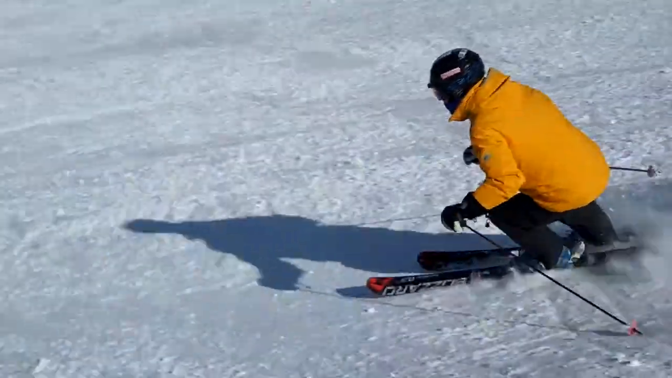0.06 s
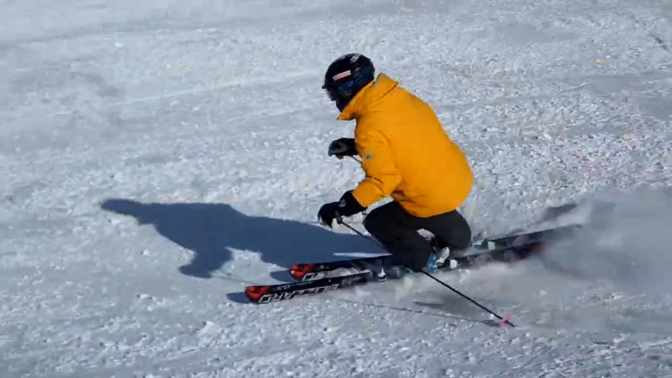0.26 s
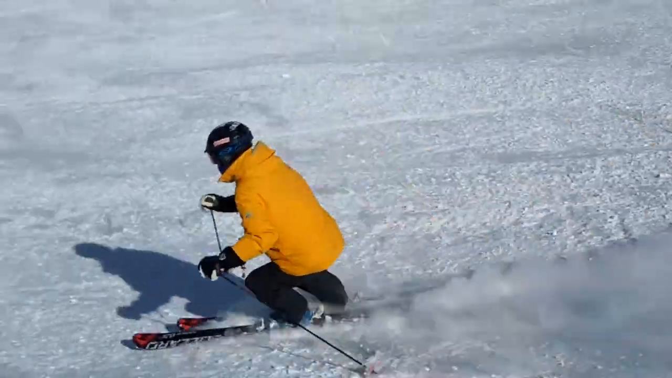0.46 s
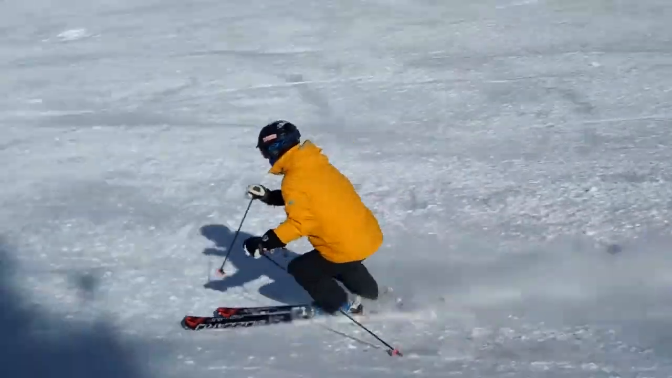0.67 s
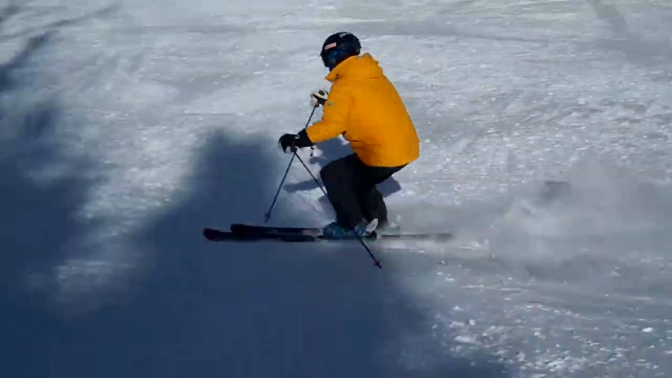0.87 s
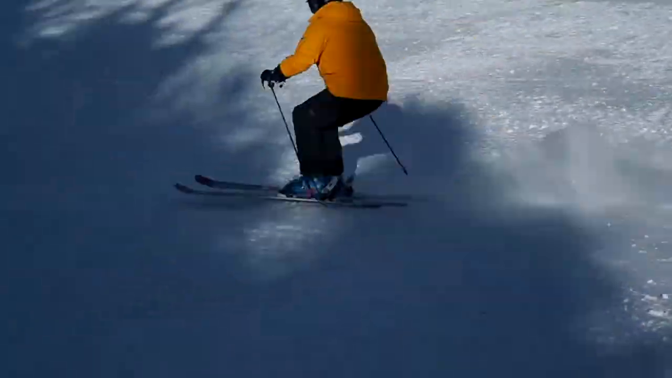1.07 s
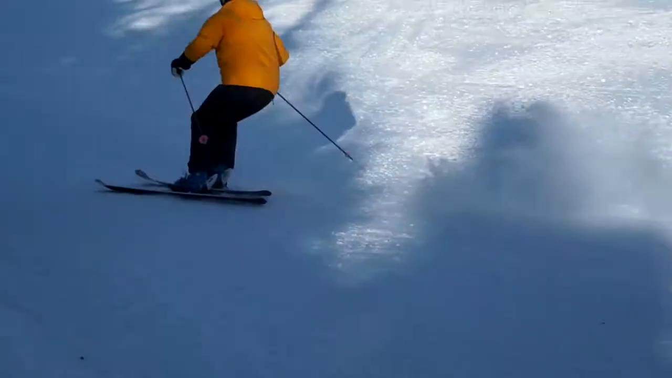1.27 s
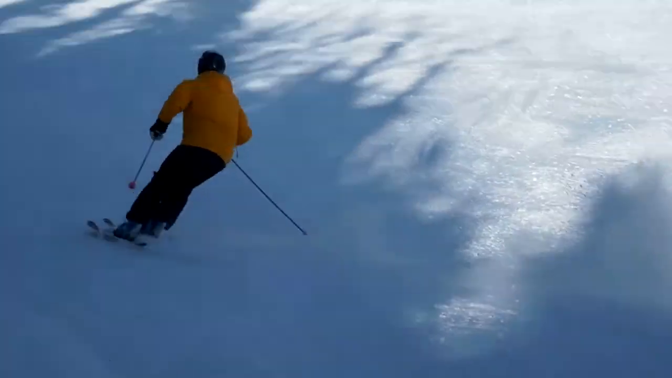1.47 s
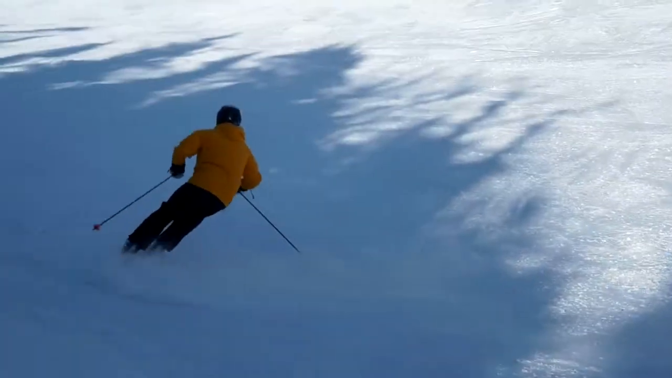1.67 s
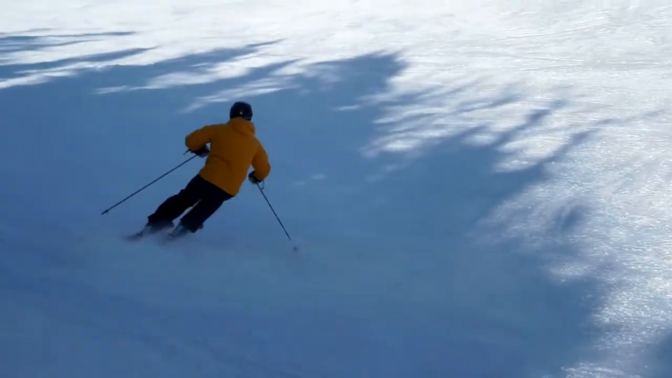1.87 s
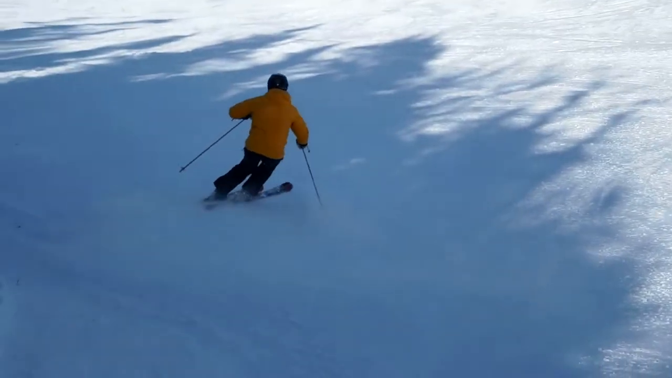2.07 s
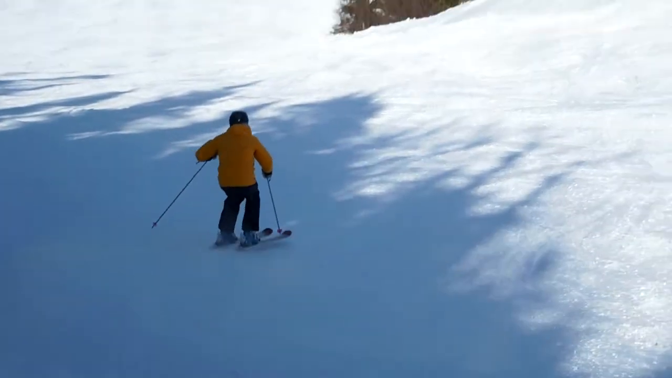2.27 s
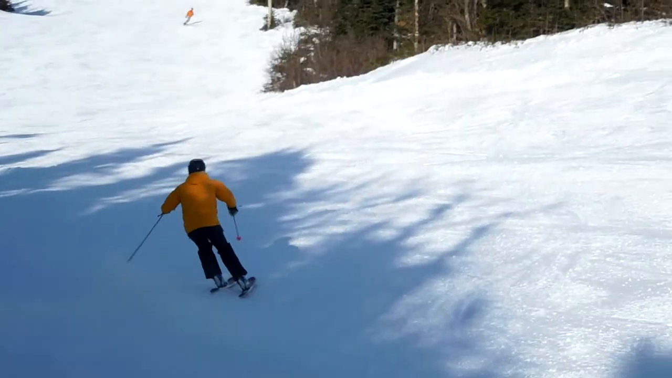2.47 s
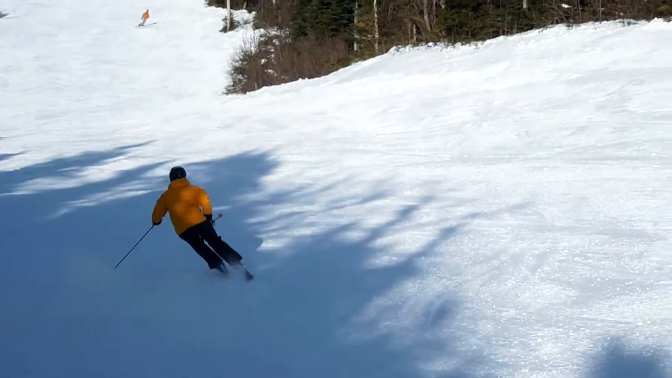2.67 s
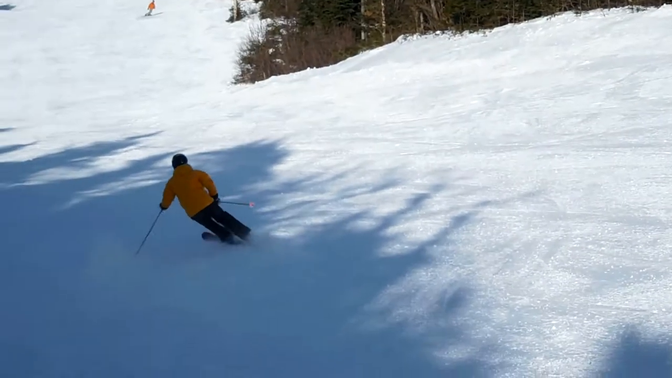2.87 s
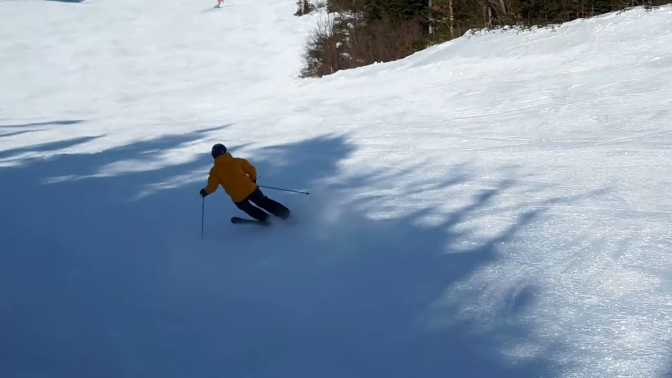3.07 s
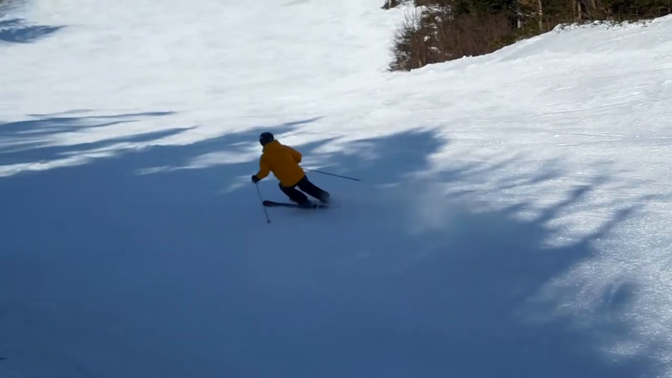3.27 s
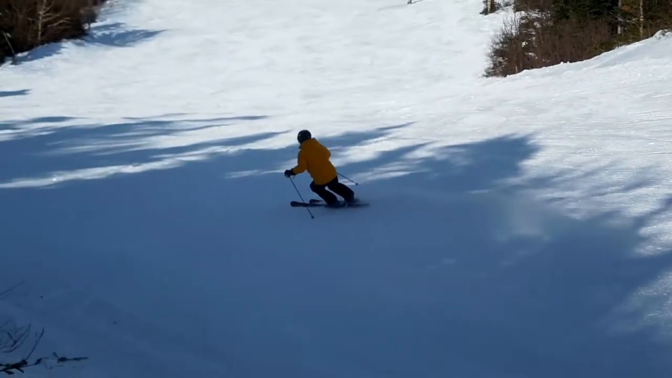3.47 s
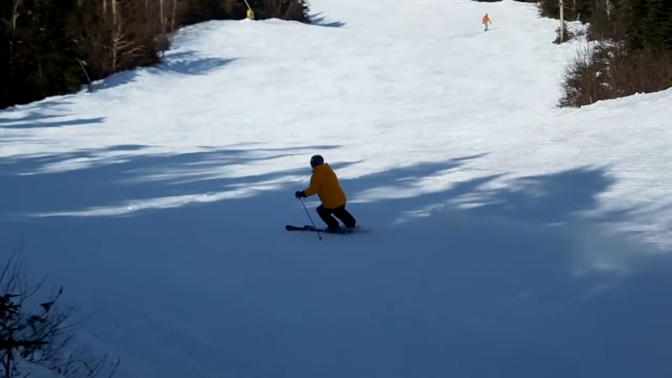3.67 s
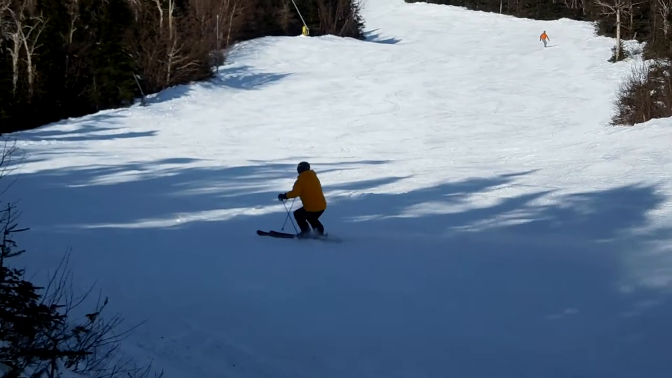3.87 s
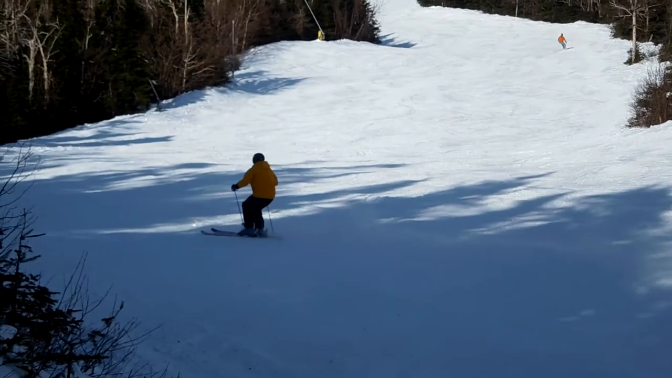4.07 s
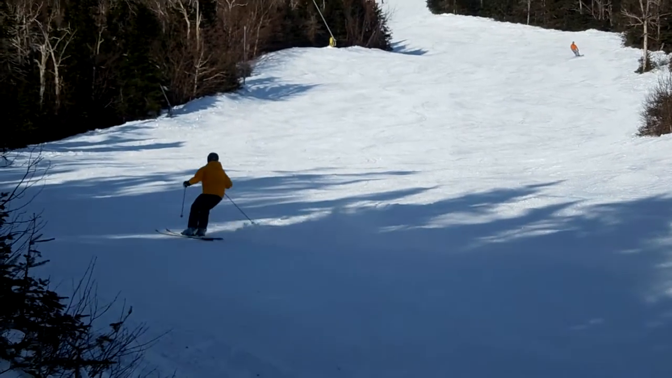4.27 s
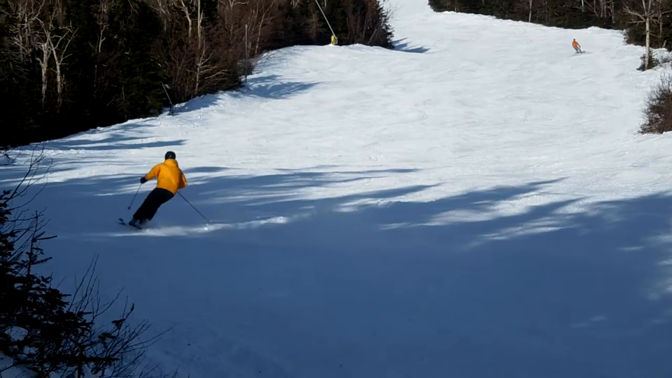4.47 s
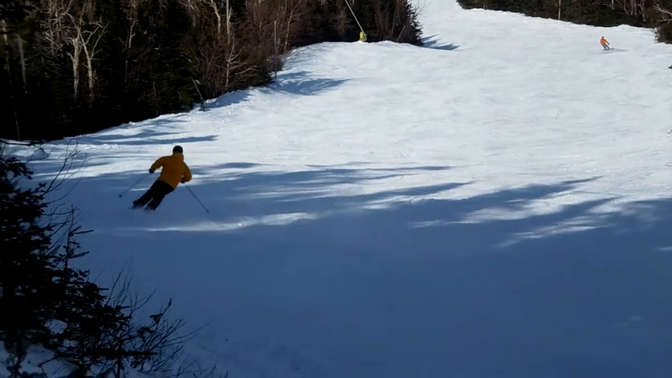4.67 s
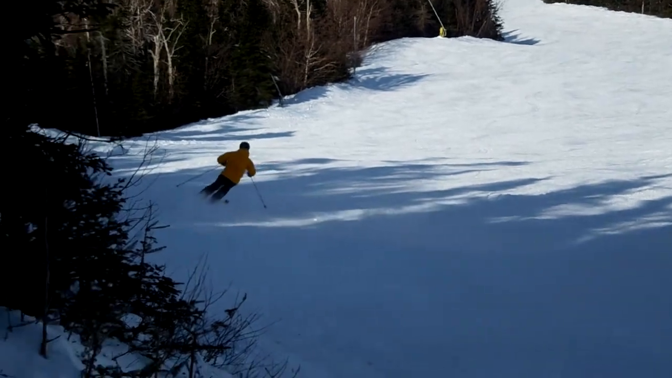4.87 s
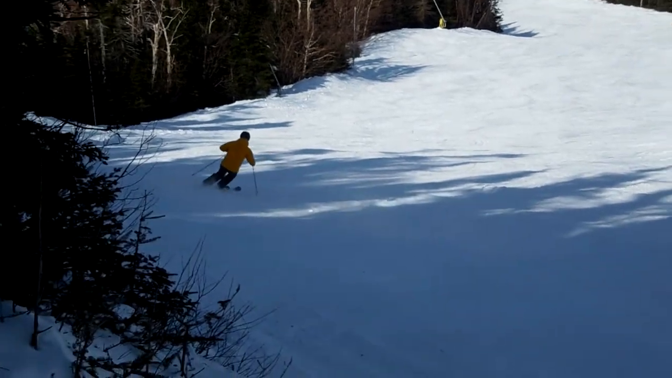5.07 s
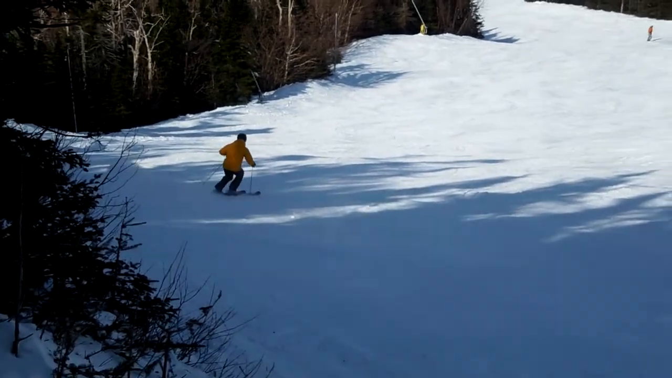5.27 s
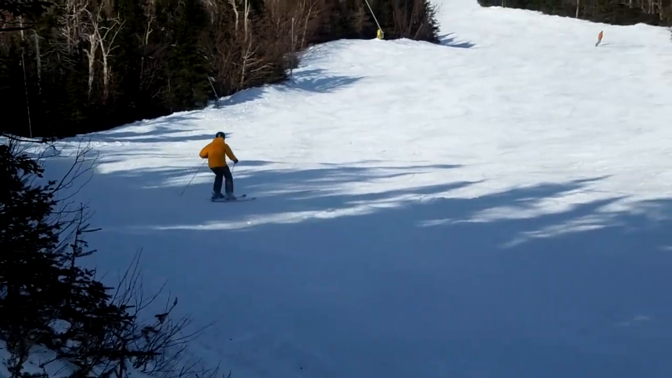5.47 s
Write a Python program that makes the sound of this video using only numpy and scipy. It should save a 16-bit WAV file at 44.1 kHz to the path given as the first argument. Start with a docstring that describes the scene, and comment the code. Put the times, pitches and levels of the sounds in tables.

```python
"""A skier carves past close by and runs away down a groomed slope in four linked turns.
Steel edges spray hissing snow, scrape and rumble: three streams of random grains, each with its own colour.
Bites ring as filtered edge slips, knocks as two damped modes, ice ticks as short bursts of pitched noise.
Behind lie the even hiss of the slope, a faint far hum and a light gusty wind on two microphone ports,
all made from shaped noise."""
import sys
import numpy as np
from scipy import signal
from scipy.fft import rfft, irfft
from scipy.io import wavfile
from scipy.ndimage import uniform_filter1d

SR = 44100
rng = np.random.default_rng(int(sys.argv[2]) if len(sys.argv) > 2 else 0)


def int16_out(signal):
    """Quantize to a 16-bit WAV file."""
    q = np.round(np.clip(np.atleast_2d(signal).T, -1, 1) * 32767)
    wavfile.write(sys.argv[1], SR, q.astype(np.int16))


N = 243167

# Colours of the sprayed snow, close by and down the slope.
# Each row: frequency in Hz, relative density in dB per Hz.
SPRAY_NEAR_COLOUR = [(1760, -21), (3000, -16), (3240, -28), (3540, -13), (5600, -8.5), (6510, -4),
                     (7220, 3.5), (8510, -2), (9560, -1.5), (10700, -7.5), (11700, -11), (15500, -22.5)]
SPRAY_FAR_COLOUR = [(2240, -45), (3800, -16), (4080, -13), (5530, -4.5), (7780, 2), (10100, -6),
                    (11100, -10.5), (15500, -38)]
# Colour of the scraping edges. Each row: frequency in Hz, relative density in dB per Hz.
SCRAPE_COLOUR = [(600, -8), (950, -13), (1300, -6.5), (1800, 0.5), (2700, 0), (3500, 1), (4200, -3),
                 (5000, -1), (6500, -30)]
# Colours of the running surface's rumble, close by and down the slope.
# Each row: frequency in Hz, relative density in dB per Hz.
RUMBLE_NEAR_COLOUR = [(70, -15), (150, -0.5), (200, 2), (300, -1.5), (450, -1), (750, -5), (1100, -11.5),
                      (1600, -14), (2400, -32)]
RUMBLE_FAR_COLOUR = [(90, -2), (160, -5), (280, 1), (400, -12.5), (540, -3.5), (720, -3.5), (1000, -9),
                     (1500, -7), (2400, -32)]


def skis():
    """Spray, scrape and rumble of broken snow, all shaken in level by one shared chatter."""
    spray_gain, scrape_gain, rumble_gain = friction()
    chatter = waver(10, 70)
    # powder thrown off the edges: dense fine grains
    spray = receding(grains(per_s=14000, spread_db=2.0), SPRAY_NEAR_COLOUR, SPRAY_FAR_COLOUR, patchy_db=2.1)
    spray = spray * spray_gain * gain_of(0.75 * chatter)
    # steel shaving the packed snow: sparser, more uneven grains
    scrape = receding(grains(per_s=7000, spread_db=2.5), SCRAPE_COLOUR, SCRAPE_COLOUR, patchy_db=1.57)
    scrape = scrape * scrape_gain * gain_of(1.15 * chatter)
    # lumps drumming on the running surface: the sparsest grains
    rumble = receding(grains(per_s=3500, spread_db=2.0), RUMBLE_NEAR_COLOUR, RUMBLE_FAR_COLOUR, patchy_db=3.0)
    rumble = rumble * rumble_gain * gain_of(0.66 * chatter)
    return spray + scrape + rumble


# Flat skis between turns, at the passing distance. One row: spray, scrape and rumble in dB.
GLIDE_LEVELS = (-35, -49.5, -42.5)
# Carved turns, at the passing distance. Each row: edge set in seconds, edge released in seconds,
# mid-turn spray in dB, mid-turn scrape in dB, rumble in dB, growth of the scrape over the turn in dB.
CARVED_TURNS = [(-.2, 1.15, -23, -39, -45.5, -3.5), (1.434, 2.422, -26.5, -33.5, -41, 16.5),
                (2.73, 4.135, -26, -32, -36, -3.5), (4.47, 5.7, -29.5, -37, -40.5, 31)]
EDGE_SET_S, EDGE_RELEASE_S = 0.2, 0.24  # time to roll onto the edges and off them
SPRAY_GROWTH = 0.55  # share of the scrape's growth in dB which the spray follows
# The tails skid and throw more snow, at the passing distance.
# Each row: start in seconds, end in seconds, spray in dB, scrape in dB.
TAIL_SKIDS = [(0.082, 0.296, -23, -39.5), (0.46, 0.79, -21, -36), (1.42, 1.693, -33, -43),
              (2.98, 3.206, -20.5, -27.5), (3.22, 3.497, -45, -29.5), (3.69, 3.77, -24, -36),
              (3.94, 4.163, -25.5, -59), (4.54, 4.716, -26, -33.5)]
SKID_RISE_S, SKID_FALL_S = 0.067, 0.11
# Stretches of ridged snow that drum on the skis, at the passing distance.
# Each row: start in seconds, end in seconds, rumble in dB.
RIDGED_STRETCHES = [(-.1, 0.304, -35.5), (0.378, 0.421, -31.5), (0.495, 0.905, -34.5), (2.26, 2.347, -34),
                    (3.057, 3.166, -29), (3.277, 3.883, -29), (3.88, 4.08, -35)]
RIDGE_FADE_S = 0.043


def friction():
    """Gains of spray, scrape and rumble: the contacts add in power and fade as one over distance."""
    t = np.arange(N) / SR
    power = gain_of(GLIDE_LEVELS)[:, None] ** 2 * np.ones(N)
    for start, end, spray_db, scrape_db, rumble_db, growth_db in CARVED_TURNS:
        progress = np.clip((t - start) / (end - start), 0, 1)
        growth = growth_db * (progress - 0.5)
        levels = [spray_db + SPRAY_GROWTH * growth, scrape_db + growth, np.full(N, rumble_db)]
        power += (gain_of(levels) * held(start, end, EDGE_SET_S, EDGE_RELEASE_S)) ** 2
    for start, end, spray_db, scrape_db in TAIL_SKIDS:
        skid = gain_of([[spray_db], [scrape_db]]) * held(start, end, SKID_RISE_S, SKID_FALL_S)
        power[:2] += skid ** 2
    for start, end, rumble_db in RIDGED_STRETCHES:
        drumming = gain_of(rumble_db) * held(start, end, RIDGE_FADE_S, RIDGE_FADE_S)
        power[2] += drumming ** 2
    return np.sqrt(power) * PASS_DISTANCE_M / distance()


# Stereo image of the skier, close by and down the slope.
# Each row: frequency in Hz, likeness of the two ears from 0 to 1, phase by which left leads in radians.
NEAR_EARS = [(1520, 1, 0), (3100, 0.88, 0.051), (3900, 0.99, -.05), (5800, 0.71, -0.17),
             (7000, 0.63, -0.071), (7500, 0.9, .45), (8150, 0.8, 1.2), (8800, 0.46, 0.26),
             (10300, 0.85, .1), (12400, 0.67, 0), (13800, 0.2, -.3)]
FAR_EARS = [(2040, 1, 0.094), (2600, .62, -.15), (3420, 0.96, -0.12), (4200, .55, .5), (5000, 0.65, 0.078),
            (7100, 0.67, 0.55), (8300, .66, 1.34), (9200, .6, 1.1), (10000, .68, 0.71), (11300, .4, 0.93),
            (13000, .35, 0)]
# distance at which the near colour has half given way to the far one, and how abruptly
FAR_M, FAR_STEEPNESS = 14.4, 4.7


def receding(drive, near_colour, far_colour, patchy_db):
    """The same friction crossfades in power from its close colour to its colour down the slope."""
    near = 1 / (1 + (distance() / FAR_M) ** FAR_STEEPNESS)
    close = coloured(drive, near_colour, NEAR_EARS, patchy_db)
    # reversed, so its grains do not line up with the close ones
    distant = coloured(drive[::-1], far_colour, FAR_EARS, patchy_db)
    return np.sqrt(near) * close + np.sqrt(1 - near) * distant


# the skier's straight course: moment of passing, nearest distance, speed
PASS_S, PASS_DISTANCE_M, SPEED_M_PER_S = 0.4, 8.18, 10.77


def distance():
    """Metres from the microphone to a skier at steady speed on a straight line."""
    along = SPEED_M_PER_S * (np.arange(N) / SR - PASS_S)
    return np.hypot(PASS_DISTANCE_M, along)


# A bent ski sings while its edge bites.
# Each row: start in seconds, end in seconds, pitch in Hz, 3 dB bandwidth in Hz, rms level before fades in dB.
EDGE_BITES = [(.02, .14, 266, 151, -36.5), (1.75, 2.43, 2140, 596, -44), (2.287, 2.407, 2000, 1000, -49),
              (1.65, 2.47, 3160, 645, -43.5), (2.95, 3.097, 2930, 400, -45), (3.27, 3.467, 225, 130, -43),
              (3.434, 3.55, 1110, 600, -43), (3.557, 4.102, 705, 170, -50), (3.68, 4.226, 3520, 400, -52),
              (5.021, 5.6, 2210, 740, -48), (5.197, 5.6, 830, 298, -51.5)]


def bites():
    """Uneven slips of the edge drive one resonance of the ski for the length of a bite."""
    out, f = np.zeros(N), np.fft.rfftfreq(SR, 1 / SR)
    slips = grains(per_s=2500, spread_db=0.5) * gain_of(2.8 * waver(6, 40))
    for start, end, hz, width_hz, db in EDGE_BITES:
        stretch = slips[max(int(start * SR), 0):int(end * SR)]
        resonance = 1 / (1 + 1.3j * (f - hz) / width_hz) ** 2
        ring = irfft(rfft(stretch, SR) * resonance, SR)[:len(stretch)]
        fades = signal.windows.tukey(len(ring), 0.25)
        add(out, start, gain_of(db) * evened(ring) * fades)
    return out


# Skis and poles knocking on hard snow, before the low cut.
# Each row: time in seconds, level of the lower mode in dB, its pitch in Hz,
# upper mode relative to the lower in dB, time to decay by 60 dB in seconds.
SNOW_KNOCKS = [(0.1605, -18.5, 330, -3, .044), (.1896, -29, 898, 10.5, 0.048),
               (0.2778, -21, 513, -2.5, 0.017), (.353, -32, 682, 5.5, 0.055), (.398, -21, 367, -6, 0.018),
               (.4355, -19, 600, -11, 0.024), (0.5287, -20.5, 480, -13, 0.055),
               (0.7106, -6.5, 450, -3, 0.0086), (.862, -35, 594, -3, 0.019),
               (1.272, -30.5, 535, -0.5, 0.023), (1.5703, -21.5, 597, -1.5, .028),
               (2.109, -24.5, 840, -24, .02), (3.7595, -24, 1120, -19, .019), (4.18, -28, 685, -2, 0.01)]
OVERTONE = 2.2  # ratio of a knock's upper mode to its pitch


def knocks():
    """A blow is a short push that rings two heavily damped modes in opposite senses."""
    out, t = np.zeros(N), np.arange(4000) / SR
    push = np.sin(np.pi * t / 0.0002) * np.exp(-t / 0.00006)
    for s, db, hz, overtone_db, t60 in SNOW_KNOCKS:
        upper = gain_of(overtone_db) * np.sin(2 * np.pi * OVERTONE * hz * t)
        lower = np.sin(2 * np.pi * hz * t)
        ring = gain_of(-60 * t / t60) * (upper - lower)
        add(out, s, gain_of(db) * (ring + 0.38 * push))
    low_cut = signal.butter(2, 240, "high", fs=SR, output="sos")
    return signal.sosfilt(low_cut, out)


# Ice cracking under an edge. Each row: time in seconds, rms level before rise and decay in dB, pitch in Hz,
# distance from the pitch to half amplitude in Hz, time to decay by 60 dB in seconds.
ICE_TICKS = [(.1615, -18, 7430, 1600, .016), (0.1905, -5, 8350, 1100, 0.016),
             (.1922, -19, 3000, 2500, 0.024), (0.1916, -4, 7460, 800, 0.018),
             (.3417, -11, 7800, 1600, .015), (0.3998, -10, 7500, 1600, 0.016),
             (.7107, -19, 2300, 1400, 0.021), (.7128, -15, 7300, 1200, 0.011),
             (1.5617, -18, 7440, 1900, 0.0088), (1.7102, -23, 6800, 2400, .01),
             (1.8035, -15, 6000, 1800, .0074), (3.758, -20.5, 7150, 2800, .0091),
             (4.68, -28, 6000, 2400, .014)]
TICK_RISE = 0.044  # rise of a crack, as a share of its decay time


def ticks():
    """A crack in the ice: a brief noise burst round one pitch, with a fast rise and decay."""
    out, t = np.zeros(N), np.arange(2048) / SR
    f = np.fft.rfftfreq(len(t), 1 / SR)
    for s, db, hz, width_hz, t60 in ICE_TICKS:
        band = 1 / (1 + ((f - hz) / width_hz) ** 4)
        burst = irfft(rfft(rng.standard_normal(len(t))) * band)
        rise = np.minimum(t / (TICK_RISE * t60), 1)
        add(out, s, gain_of(db - 60 * t / t60) * rise * evened(burst))
    return out


# Colour of the light breeze. Each row: frequency in Hz, relative density in dB per Hz before the treble cut.
BREEZE_COLOUR = [(12, 3.5), (40, 6.5), (80, -4.5), (150, -10), (220, -28)]
# Gusts break into smaller eddies than the breeze.
# Each row: frequency in Hz, relative density in dB per Hz before the treble cut.
GUST_COLOUR = [(12, -1.5), (45, 7), (80, 1), (150, -3), (220, -20)]
# Gusts on the microphone; the shortest do not reach their full level.
# Each row: start in seconds, end in seconds, full level in dB.
WIND_GUSTS = [(-.1, 0.164, -33.5), (0.18, 0.276, -29), (0.364, 0.443, -27), (.46, 0.674, -38.5),
              (0.767, 1.132, -40), (4.764, 4.803, -35.5), (5.1, 5.176, -38)]
GUST_FADE_S = 0.057
BREEZE_DB, BREEZE_SWING_DB = -51, 1  # the light wind between gusts


def wind():
    """A wavering breeze of low turbulence on the ports, with a few gusts on top."""
    breeze = gain_of(BREEZE_DB + BREEZE_SWING_DB * waver(1.516, 7.3))
    gusts = sum(gain_of(db) * held(start, end, GUST_FADE_S, GUST_FADE_S) for start, end, db in WIND_GUSTS)
    return breeze * eddies(BREEZE_COLOUR, shared=1.1) + gusts * eddies(GUST_COLOUR, shared=0.7)


def eddies(colour, shared):
    """Low turbulence: one part common to both ports, one part of its own at each."""
    f = np.fft.rfftfreq(N, 1 / SR)
    both, left, right = rfft(rng.standard_normal((3, N)))
    pair = shared * both + np.array([left, right])
    treble_cut = 1 / (1 + (f / 220) ** 6)
    return evened(irfft(pair * gain_of(read(colour, f)) * treble_cut, N))


# Colour of the open slope's hiss. Each row: frequency in Hz, relative density in dB per Hz.
AIR_COLOUR = [(35, -43), (60, -30), (98, -12), (179, -9.5), (278, -7.5), (312, -7.5), (641, -14.5),
              (809, -14), (888, -14), (1200, -16.5), (1320, -16.5), (4110, -16.5), (15500, -20)]
# Stereo image of that hiss.
# Each row: frequency in Hz, likeness of the two ears from 0 to 1, phase by which left leads in radians.
AIR_EARS = [(100, 1, 0), (795, 0.94, 0), (2000, 0.51, 0), (4000, 0.049, 0), (14000, 0.24, 0)]
AIR_DB = -43
HUM_HZ, HUM_WIDTH_HZ, HUM_DB = 104.3, 13.5, -53  # width: from the pitch to half amplitude


def outdoors():
    """Even hiss of the open slope and a far machine hum, a narrow band of noise."""
    air = gain_of(AIR_DB) * coloured(rng.standard_normal(N), AIR_COLOUR, AIR_EARS, patchy_db=0.3)
    f = np.fft.rfftfreq(N, 1 / SR)
    band = 1 / (1 + ((f - HUM_HZ) / HUM_WIDTH_HZ) ** 2)
    hum = evened(irfft(rfft(rng.standard_normal(N)) * band, N))
    return air + gain_of(HUM_DB) * hum


def grains(per_s, spread_db):
    """Breaking snow crystals: randomly timed clicks of either sign and uneven size."""
    size = gain_of(spread_db * np.minimum(rng.exponential(1, N), 5))
    struck = rng.random(N) < per_s / SR
    return evened(size * rng.choice([-1, 1], N) * struck)


def coloured(drive, colour, image, patchy_db):
    """Gives a drive its spectrum and drifting patches, a lead to one ear and a diffuse part in each."""
    sources = np.vstack([drive, rng.standard_normal((2, N))])
    hz, _, z = signal.stft(sources, SR, nperseg=1024, noverlap=768)
    same, lead = (read(np.array(image)[:, [0, k]], hz)[:, None] for k in (1, 2))
    same = np.clip(same, 0, 1)
    direct = z[0] * np.exp(0.5j * np.array([lead, -lead]))
    # random level, smoothed over 12 frequency bins and 9 frames
    patches = uniform_filter1d(rng.standard_normal(z[0].shape), size=12, axis=0)
    patches = evened(uniform_filter1d(patches, size=9, axis=1))
    gain = gain_of(read(colour, hz)[:, None] + patchy_db * patches)
    pair = (np.sqrt(same) * direct + np.sqrt(1 - same) * z[1:]) * gain
    return evened(signal.istft(pair, SR, nperseg=1024, noverlap=768)[1][:, :N])


def held(start, end, rise_s, fall_s):
    """Product of a linear attack, half way at start, and a linear release, half way at end."""
    t = np.arange(N) / SR
    up = np.clip(0.5 + (t - start) / rise_s, 0, 1)
    down = np.clip(0.5 + (end - t) / fall_s, 0, 1)
    return up * down


def waver(low_hz, high_hz):
    """Slow random swing of rms 1: thirty sines of random phase between two rates."""
    t = np.arange(0, N, 32) / SR
    rates = np.geomspace(low_hz, high_hz, 30)
    slow = sum(np.sin(2 * np.pi * (f * t + rng.random())) for f in rates)
    return np.interp(np.arange(N) / SR, t, evened(slow))


def gain_of(db):
    """Decibels to amplitude."""
    return 10 ** (np.asarray(db) / 20)


def evened(x):
    """Scales to rms 1."""
    return x / np.sqrt(np.mean(x ** 2) + 1e-20)


def read(points, hz):
    """Reads a table on a log-frequency axis."""
    f, value = np.transpose(points)
    return np.interp(np.log(hz + 1), np.log(f + 1), value)


def add(mix, s, sound):
    """Mixes a short sound in at time s."""
    part = mix[max(round(s * SR), 0):][:len(sound)]
    part += sound[:len(part)]


def scene():
    """The skier on the open slope; snow gives no echo."""
    return skis() + bites() + knocks() + ticks() + wind() + outdoors()


# The two ports ring at different pitches. Each row: frequency in Hz, left relative to right in dB.
PORT_BALANCE = [(2200, -0.5), (2800, -2), (3500, -1.5), (4200, -0.5), (4900, -2), (6000, 0.5), (6500, -6.5),
                (7250, -7), (8000, -4.5), (8500, 2.5), (9400, 4.5), (10700, 5), (12300, 2), (14200, 5.5),
                (15500, -2)]
OVERLOAD = 0.9  # amplitude at which the microphone clips
BAND_LIMIT_HZ = 15700


def record(dry):
    """The balance of the two microphone ports, then hard overload, then the band limit."""
    f = np.fft.rfftfreq(N, 1 / SR)
    # long waves reach both ports alike
    lean = gain_of(read([(1000, 0)] + list(PORT_BALANCE), f))
    ports = np.array([lean, np.ones_like(lean)]) / np.sqrt((1 + lean ** 2) / 2)  # keeps the mean power
    heard = irfft(rfft(dry) * ports, N)
    heard = np.clip(heard, -OVERLOAD, OVERLOAD)
    band_limit = signal.firwin(511, BAND_LIMIT_HZ, window=("kaiser", 9), fs=SR)
    return signal.oaconvolve(heard, band_limit[None], "same")


dry = scene()
out = record(dry)
int16_out(out)
```